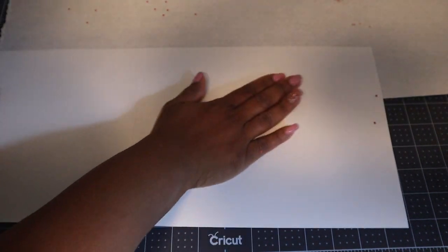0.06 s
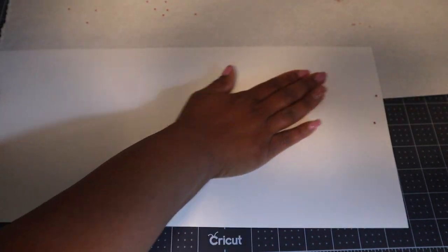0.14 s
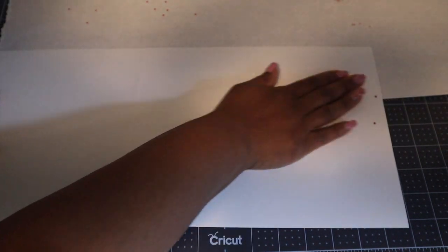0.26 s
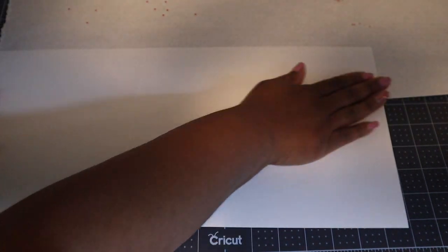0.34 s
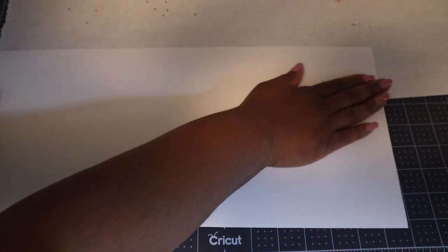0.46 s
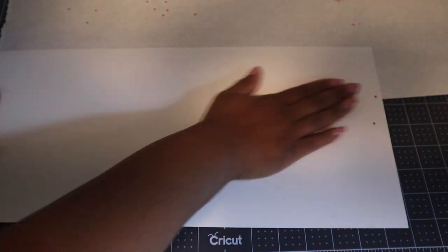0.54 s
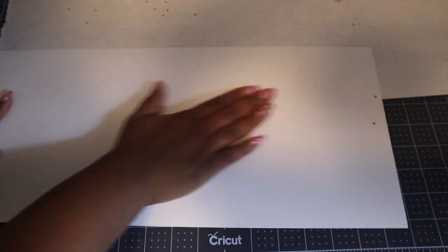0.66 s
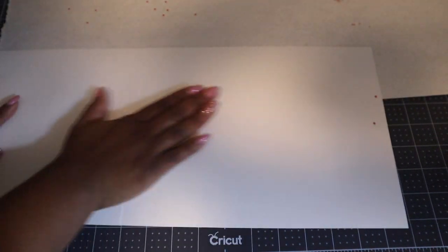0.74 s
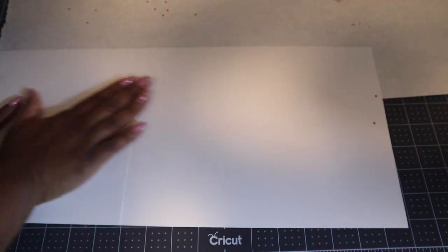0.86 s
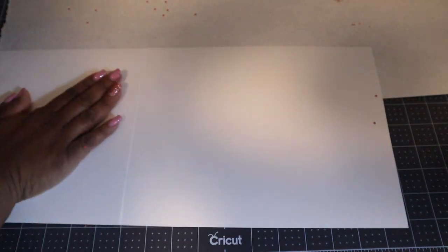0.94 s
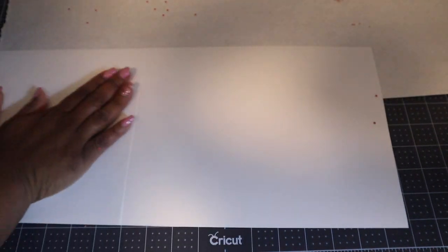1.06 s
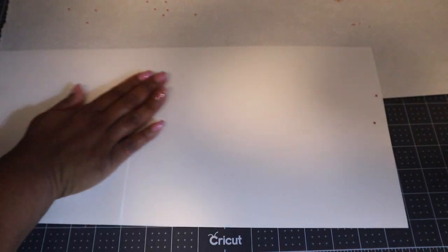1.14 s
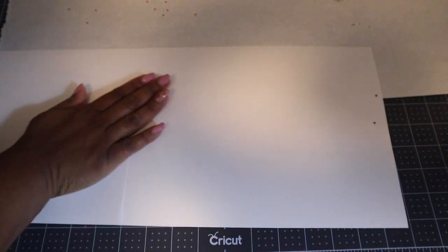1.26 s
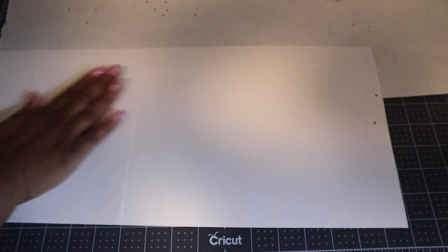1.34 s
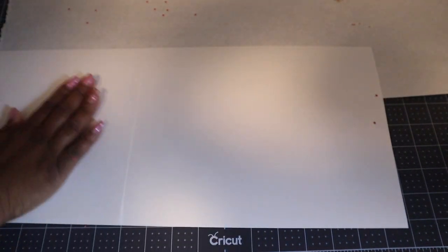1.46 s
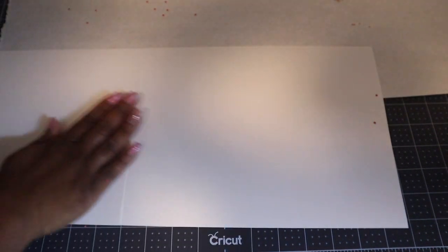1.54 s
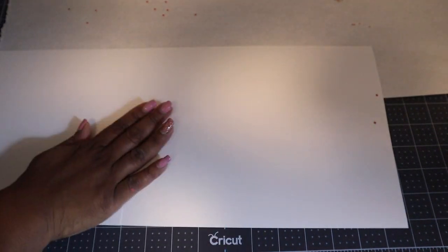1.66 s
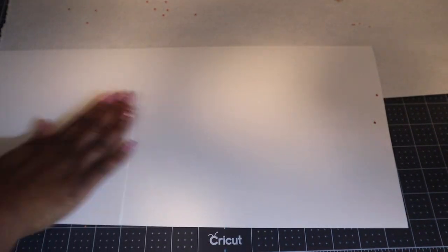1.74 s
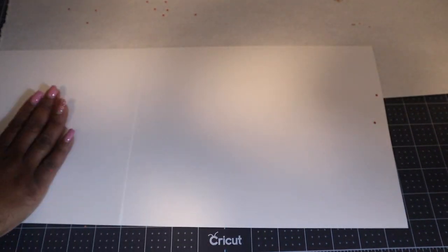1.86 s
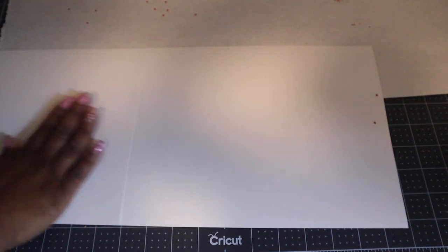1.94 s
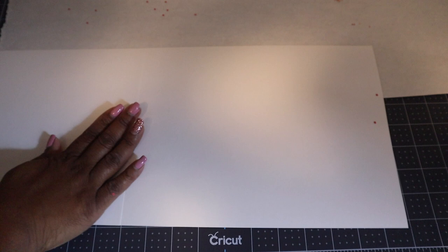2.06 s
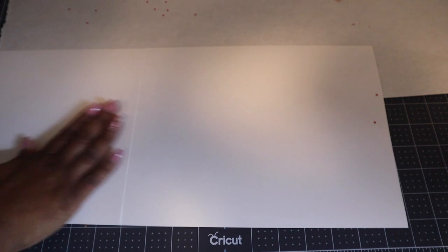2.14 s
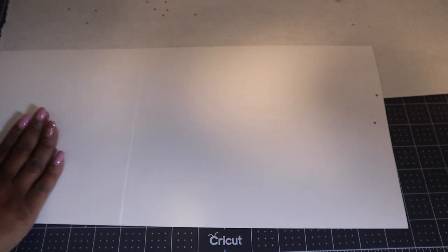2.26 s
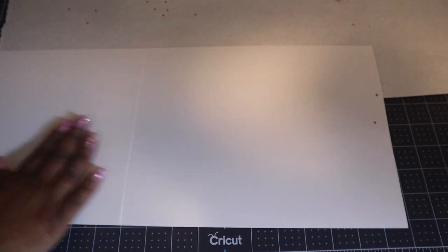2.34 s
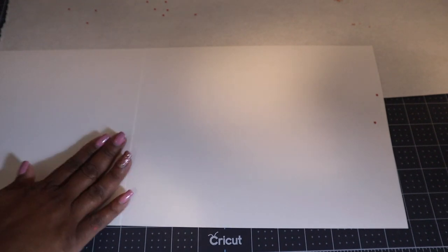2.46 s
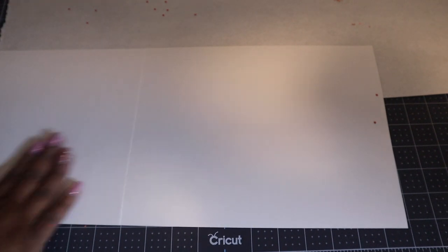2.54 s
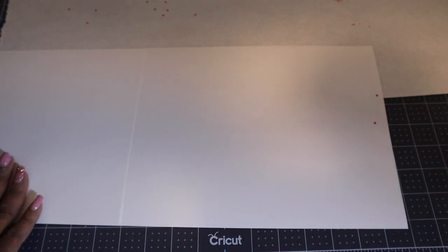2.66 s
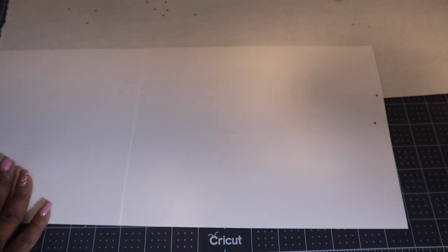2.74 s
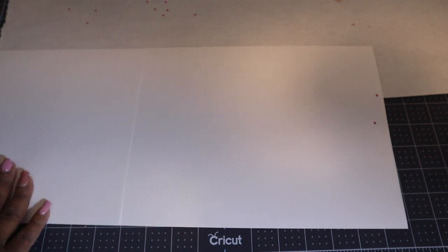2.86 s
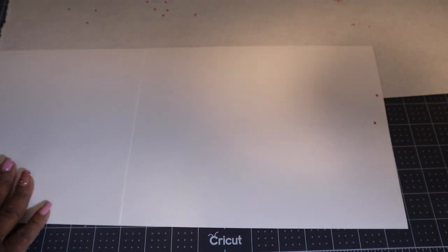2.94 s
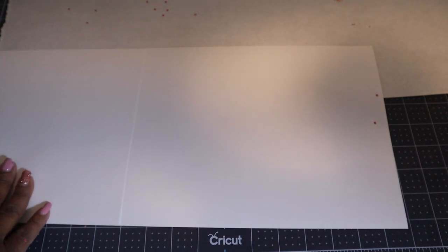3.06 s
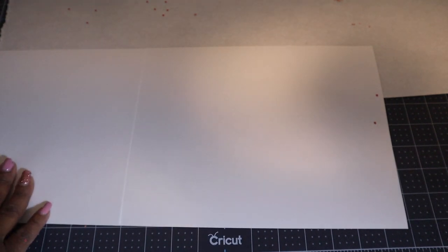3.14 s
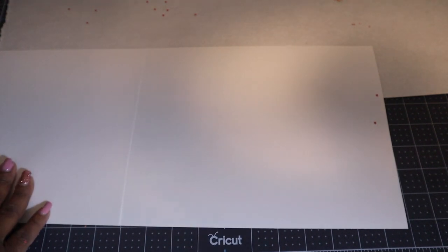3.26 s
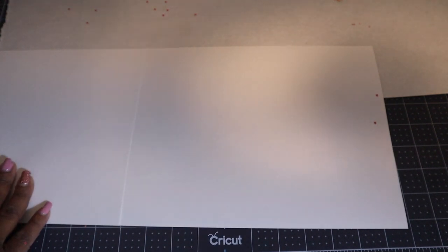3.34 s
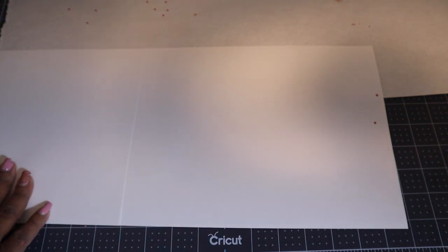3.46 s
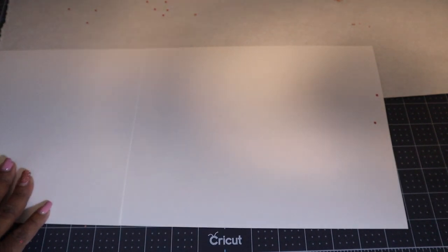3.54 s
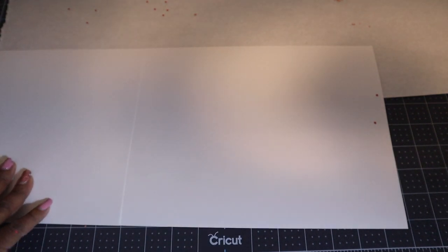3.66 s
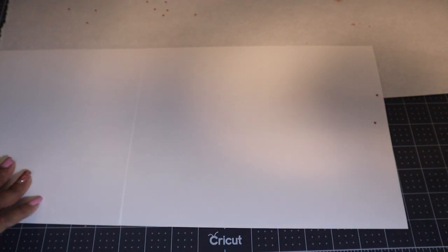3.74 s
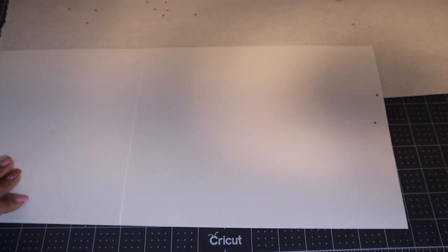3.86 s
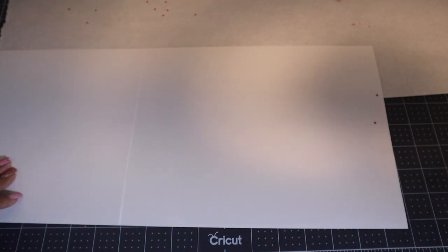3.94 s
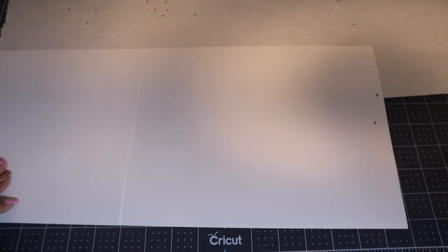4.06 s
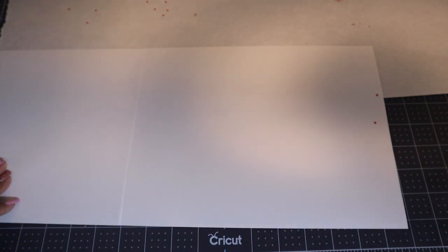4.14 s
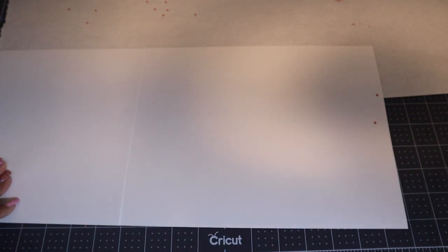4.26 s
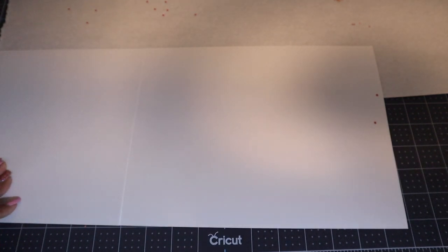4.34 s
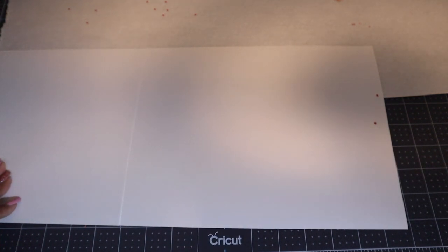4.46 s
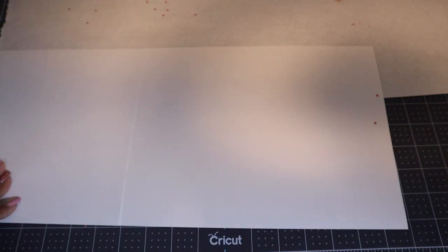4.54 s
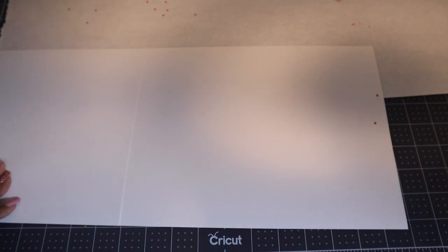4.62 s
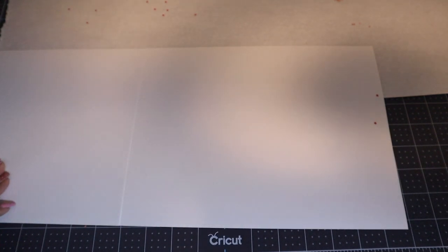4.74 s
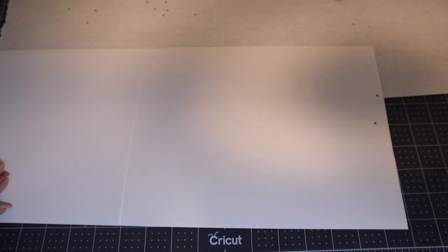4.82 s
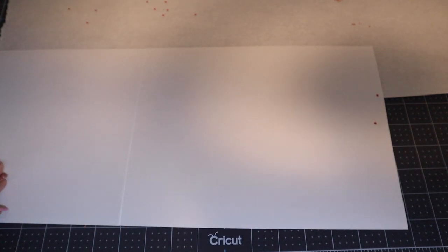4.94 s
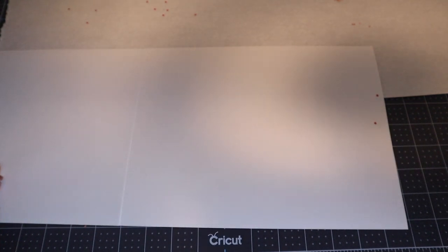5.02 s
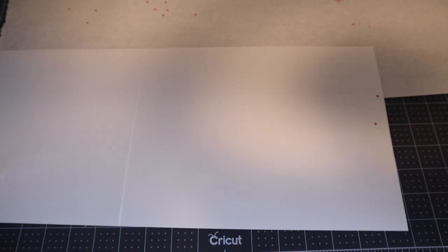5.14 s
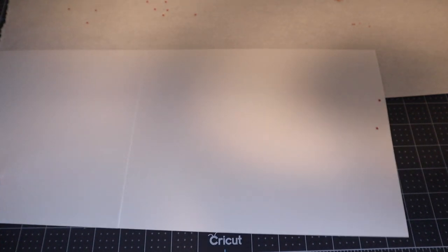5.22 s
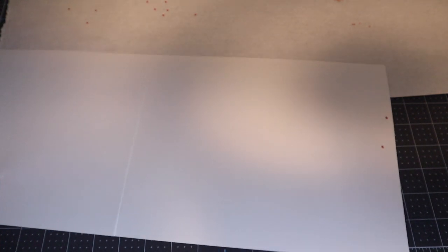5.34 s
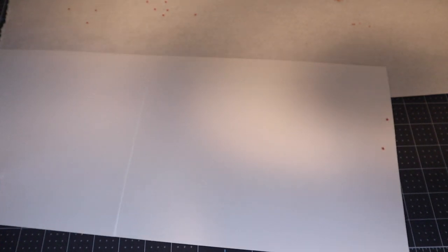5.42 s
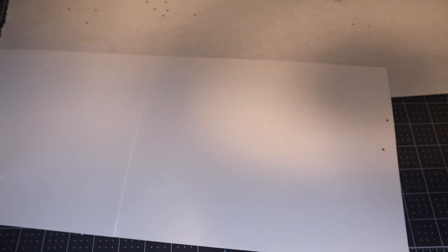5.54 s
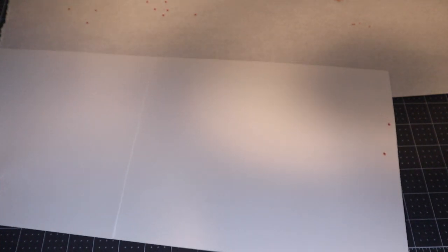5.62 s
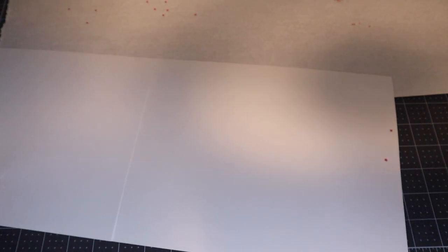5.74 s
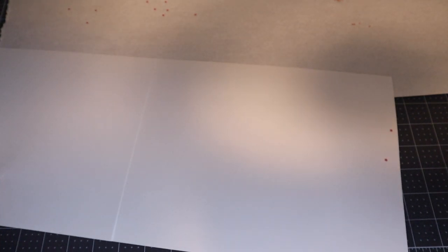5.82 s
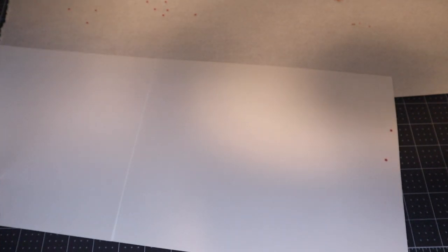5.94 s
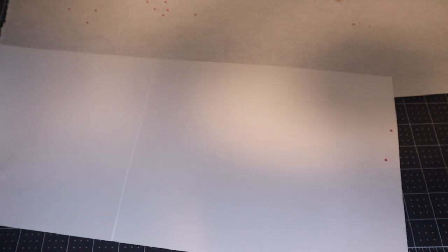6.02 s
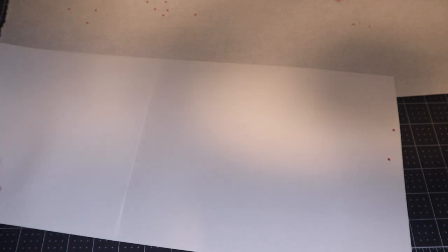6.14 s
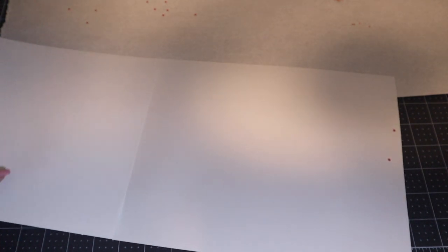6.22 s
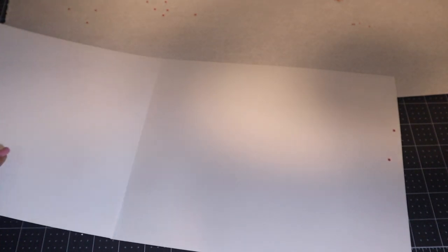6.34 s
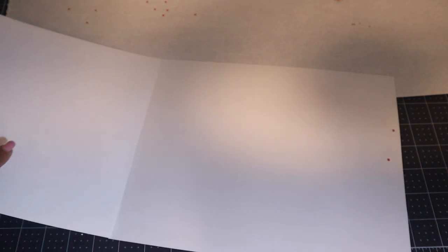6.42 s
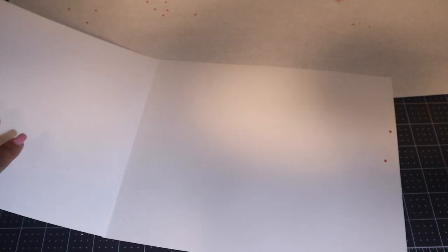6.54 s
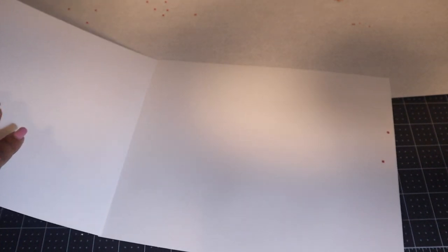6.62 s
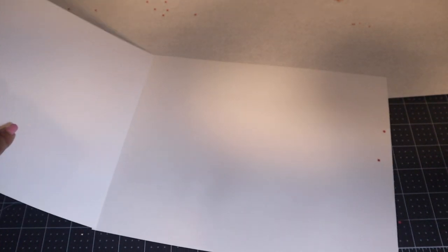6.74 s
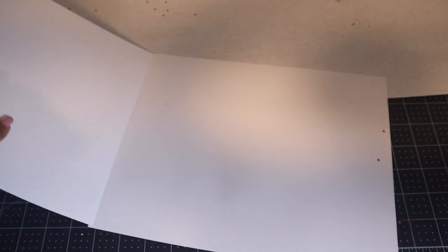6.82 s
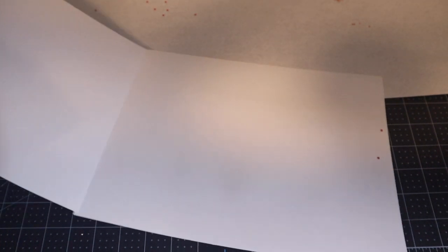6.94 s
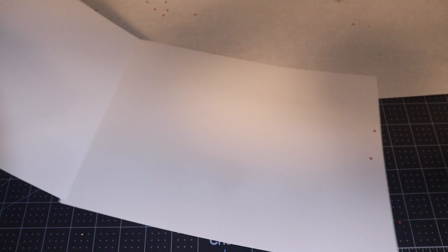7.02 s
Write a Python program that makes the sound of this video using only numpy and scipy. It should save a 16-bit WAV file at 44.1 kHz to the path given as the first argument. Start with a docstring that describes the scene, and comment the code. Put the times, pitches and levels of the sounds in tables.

```python
"""Quick dry palm strokes smooth a plastic sheet on a craft table, with nails ticking over a crease.
Then the sheet is nudged and lifted: it slides, crinkles and buckles with small pops, amid knocks on the table.
Friction is shaped noise driven by hand speed and pressure; ticks, pops and knocks are short ringing blows.
The table rumbles under the arm and faint air noise wavers behind it.
Two close microphone ports hear it in a small room, through a comb filter for mains hum."""
import sys
import numpy as np
from scipy import signal
from scipy.fft import rfft, irfft, next_fast_len
from scipy.io import wavfile
from scipy.ndimage import uniform_filter1d, map_coordinates

SR = 44100
rng = np.random.default_rng(int(sys.argv[2]) if len(sys.argv) > 2 else 0)


def transcribe(u):
    """Save the signal u as a 16-bit wav file named by the first command-line argument.

    u: samples, shape (n,) or (channels, n), limited to [-1, 1]; the rate is SR.
    q: integer samples, one column per channel.
    """
    v = np.clip(np.atleast_2d(u).T, -1, 1)
    q = np.round(v * 32767).astype(np.int16)
    wavfile.write(sys.argv[1], SR, q)


N = 312228


def amp(db):
    """Decibels to gain."""
    return 10 ** (np.asarray(db) / 20)


def unit(x):
    """Scale to rms 1."""
    return x / np.sqrt(np.mean(x ** 2) + 1e-20)


def along(points, hz):
    """(frequency, value) points read on a log frequency axis."""
    f, v = np.transpose(points)
    return np.interp(np.log(hz + 1), np.log(f + 1), v)


def curves(rows):
    """One value per sample for each column after the time."""
    s, *cols = np.transpose(rows)
    return [np.interp(np.arange(N) / SR, s, c) for c in cols]


def wobble(rate):
    """A smooth random curve with `rate` knots a second."""
    knots = rng.standard_normal(int(N * rate / SR) + 4)
    return map_coordinates(knots, [np.arange(N) * rate / SR])


def ease(u):
    """A quarter sine from 0 to 1, flat before and after."""
    return np.sin(np.pi / 2 * np.clip(u, 0, 1))


def filtered(x, response):
    """x times a complex response of frequency."""
    m = next_fast_len(N + SR // 2)
    return irfft(rfft(x, m) * response(np.fft.rfftfreq(m, 1 / SR)), m)[..., :N]


def coloured(x, spectrum):
    """x given a spectrum, at rms 1."""
    return unit(filtered(x, lambda hz: amp(along(spectrum, hz))))


def causal(spectrum, size=2048):
    """Minimum-phase impulse response of peak 1: this spectrum with a sharp front."""
    cepstrum = irfft(np.log(amp(along(spectrum, np.fft.rfftfreq(size, 1 / SR)))))
    # fold the cepstrum forward in time
    cepstrum[1:size // 2] *= 2
    cepstrum[size // 2 + 1:] = 0
    h = irfft(np.exp(rfft(cepstrum)))
    return h / np.abs(h).max()


def swept(x, pitch_hz, shape):
    """x through a resonance that moves with the pitch, at rms 1."""
    hz, t, z = signal.stft(x, SR, nperseg=512)
    pitch_now = np.interp(t * SR, np.arange(N), pitch_hz)
    octaves = np.log2((hz[:, None] + 1) / pitch_now)
    gain = amp(np.interp(octaves, *np.transpose(shape)))
    return unit(signal.istft(z * gain, SR, nperseg=512)[1][:, :N])


def impulses(rate, uneven_db):
    """Tiny blows at random moments: most are weak, a few stand out."""
    draw = rng.random((int(rate * N / SR), 2))
    size = amp(uneven_db * np.minimum(-np.log(1 - draw[:, 1]), 2))
    signs = rng.choice([-1, 1], len(size))
    return np.bincount((draw[:, 0] * N).astype(int), size * signs, N)


def add(track, s, sound):
    """Mix a sound into a track at time s."""
    part = track[max(round(s * SR), 0):][:len(sound)]
    part += sound[:len(part)]


def ports(x, lead):
    """A mono source at two ports: half the phase lead goes to each, in opposite directions."""
    return filtered(x, lambda hz: np.exp(.5j * np.outer([1, -1], along(lead, hz))))


# where the hand rubs: (time [s], place [0 left - 1 right])
HAND_PLACE = [(0, 0.92), (.3, 0.67), (.6, 0.94), (.8, 0.068), (1.1, 0.008)]
# phase by which the left port leads, for a source on either side: (frequency [Hz], lead [radians])
LEAD_FROM_LEFT = [(100, 0), (1000, .35), (2000, 1.2), (3200, 2), (5700, 2.65), (8000, 2.55), (10300, 2.6),
                  (11800, 3.05)]
LEAD_FROM_RIGHT = [(100, -1.8), (2000, -1.4), (4500, 0.34), (6500, -1.5), (12000, -1.4)]


def placed(x, left_db):
    """A source shared between left and right as the hand moves; left_db sets the left source's port imbalance."""
    right = np.clip(curves(HAND_PLACE)[0], 0, 1)
    left_side = ports(x[0] * np.sqrt(1 - right), LEAD_FROM_LEFT) * amp([[left_db / 2], [-left_db / 2]])
    right_side = ports(x[-1] * np.sqrt(right), LEAD_FROM_RIGHT) * amp([[-1.2], [1.2]])
    return left_side + right_side


# how long the room rings: (frequency [Hz], decay by 60 dB [s])
ROOM_DECAY = [(150, 0.36), (2000, 0.22), (6000, 0.16), (12000, 0.13)]


def room(x, wet_db):
    """Direct sound and a short diffuse tail whose decay time varies with frequency."""
    hz, t, z = signal.stft(rng.standard_normal((2, SR // 3)), SR, nperseg=256)
    decay = amp(-60 * t / along(ROOM_DECAY, hz)[:, None])
    tail = signal.istft(z * decay, SR, nperseg=256)[1]
    return x + amp(wet_db) * signal.fftconvolve(x, tail / np.linalg.norm(tail[0]), axes=1)[:, :N]


def friction(spectrum, grain_db, patchy_db, spread):
    """Countless tiny slips of uneven size over a wide patch of contact, in stereo."""
    slips = rng.standard_normal((4, N)) * amp(grain_db * wobble(2500))
    z = signal.stft(slips, nperseg=256)[2]

    def field(size, count):
        """Random levels smoothed over `size` frequency bins and `count` frames."""
        noise = uniform_filter1d(rng.standard_normal(z.shape[1:]), size, axis=0)
        return unit(uniform_filter1d(noise, count, axis=1))

    # changing contact changes which parts of the sheet sound: broad flickers, and narrow bands that last
    patches = unit(field(size=6, count=9) + field(size=3, count=40))
    slips = signal.istft(z * amp(patchy_db * patches), nperseg=256)[1][:, :N]
    return coloured(placed(slips[:2], left_db=4.5) + spread * slips[2:], spectrum)


# spectrum of the room noise: (frequency [Hz], relative level [dB])
AIR_SPECTRUM = [(20, -30), (100, -10), (250, -4.5), (380, -18), (470, -11.5), (700, -19), (1150, -48),
                (1600, -38), (2150, -21.5), (2900, -36), (4100, -33), (7000, -44.5), (15000, -61)]


def air():
    """Faint room noise that wavers slightly, partly shared by the two ports."""
    noise = rng.standard_normal(N) + .5 * rng.standard_normal((2, N))
    return amp(-70.5 + 1.5 * wobble(7.1)) * coloured(noise, AIR_SPECTRUM)


# heaviest bumps of hand and arm on the table: (time [s], relative level [dB])
ARM_BUMPS = [(.15, -33), (.564, -38), (.836, -38.5), (.98, -38.5), (1.435, -33.5), (1.54, -38.5),
             (1.828, -38.5), (2.274, -33.5), (2.638, -37.5), (2.78, -43), (3.112, -41), (4.482, -41),
             (5.782, -42)]


def bumps(swell_s):
    """Each soft push of the hand makes the table top swing unevenly a few times."""
    track, t = np.zeros(N), np.arange(SR // 8) / SR
    swell = np.exp(-((t - t.mean()) / swell_s) ** 2)
    swings = coloured(rng.standard_normal(N), TABLE_SPECTRUM)
    for k, (s, db) in enumerate(ARM_BUMPS):
        bump = swell * swings[k * len(t):][:len(t)]
        add(track, s - t.mean(), amp(db - 4.0) * bump / np.abs(bump).max())
    return track


# spectrum of the table top's boom: (frequency [Hz], relative level [dB])
TABLE_SPECTRUM = [(20, -43), (45, -31.5), (62, -13), (78, -5), (98, -14), (120, 2.5), (145, 2), (180, -6),
                  (250, -16.5), (400, -27.5), (700, -35), (1000, -46.5), (2000, -75)]
REST_DB, RUB_DB = -63, -61  # trembling under the resting arm, and what rubbing adds
ARM_INERTIA_S = 0.73  # the trembling follows the hand's speed averaged over this time


def table():
    """The table top booms in lumps under the moving arm."""
    boom = unit(coloured(rng.standard_normal(N), TABLE_SPECTRUM) * amp(3.8 * wobble(25)))
    apart = 0.14 * coloured(rng.standard_normal((2, N)), TABLE_SPECTRUM)
    effort = uniform_filter1d(rubbing()[0], size=int(ARM_INERTIA_S * SR))
    shake = amp(REST_DB) + amp(RUB_DB) * effort
    return shake * (boom + apart) + bumps(swell_s=0.025)


# knocks: (time [s], relative level [dB], hardness [dB per octave], relative scuff level [dB])
TABLE_KNOCKS = [(3.761, -54, 29, 13.5), (4.207, -41.5, -1, 16.5), (4.215, -34.5, -3, -8),
                (4.223, -31.5, -8, -2), (6.737, -45.5, 5, -4.5), (6.863, -27, 14.5, 0),
                (6.878, -36.5, -4, 3), (6.900, -35, 6, -1.5)]
# what the table rings with: (frequency [Hz], relative level [dB], decay by 60 dB [s])
RINGING_MODES = [(243, -11, 0.1), (340.5, -2.5, 0.084), (446, -2.5, 0.11), (548, -3, 0.048),
                 (715, -3.5, 0.09), (778, -10.5, 0.062)]
# spectra of the knock's rattle and of the plastic scuff: (frequency [Hz], relative level [dB])
RATTLE_SPECTRUM = [(40, -28), (100, -8), (200, -8.5), (400, -2), (750, -1), (950, -11), (1200, -25),
                   (2000, -13.5), (5000, -44.5)]
SCUFF_SPECTRUM = [(500, -36), (1200, -20), (1620, -3), (2050, 13), (2420, 3.5), (2850, -21.5), (3500, 5.5),
                  (5000, 1), (7000, -7), (11000, -23), (13000, -60)]


def knocks():
    """Knocks on the table to the left, each with a scuff of plastic; harder ones favour the higher modes."""
    track, t = np.zeros(N), np.arange(SR // 8) / SR
    hz, mode_db, t60 = np.transpose(RINGING_MODES)[:, :, None]

    def burst(spectrum):
        return unit(signal.fftconvolve(rng.standard_normal(len(t)), causal(spectrum))[:len(t)])

    for s, db, hardness_db, scuff_db in TABLE_KNOCKS:
        rattle = burst(RATTLE_SPECTRUM) * amp(-60 * t / 0.13)
        scuff = burst(SCUFF_SPECTRUM) * amp(-60 * t / 0.068)
        weights = amp(mode_db + hardness_db * np.log2(hz))
        modes = weights * amp(-60 * t / t60) * np.sin(2 * np.pi * (hz * t + rng.random(hz.shape)))
        onset = 1 - np.exp(-t / 0.00047)
        ring = modes.sum(axis=0) / np.linalg.norm(weights) * onset
        thud = 1.31 * ring + 0.52 * rattle
        add(track, s, amp(db - 8.5) * (thud + amp(scuff_db) * scuff))
    return room(ports(track, LEAD_FROM_LEFT) * amp([[3.5], [-5]]), wet_db=-13.0)


# spectrum of one snap: (frequency [Hz], relative level [dB])
SNAP_SPECTRUM = [(600, -7), (1200, -44.5), (2000, -3), (4000, 8), (7000, 2.5), (11000, 2), (15000, -25.5)]
SNAPS_PER_S, SNAP_UNEVEN_DB = 70, 4  # average rate, scatter of the sizes


def snaps():
    """Small sharp snaps where crease or grit gives way."""
    blows = impulses(SNAPS_PER_S, SNAP_UNEVEN_DB)
    return placed([signal.fftconvolve(blows, causal(SNAP_SPECTRUM))[:N]], left_db=0.5)


# shoves of the sheet over the mat:
# (start [s], rise [s], hold [s], relative hiss level [dB], relative crinkle level [dB])
SHOVES = [(0.002, 0.006, 0.035, -54, -52), (2.8, 0.0027, 0.039, -61.5, -70),
          (2.894, 0.035, 0.013, -69.5, -62), (3.047, 0.011, 0.016, -70, -81),
          (3.696, 0.014, 0.11, -65.5, -78), (3.813, 0.055, 0.063, -60, -81),
          (3.949, 0.03, 0.12, -71.5, -65), (4.299, 0.0209, 0.0063, -66.5, -59.5),
          (4.576, 0.015, 0.011, -54.5, -86), (4.858, 0.017, 0.0046, -68.5, -62.5),
          (5.129, 0.0028, 0.004, -55, -69), (5.213, 0.072, 0.051, -65.5, -64.5),
          (5.322, 0.021, 0.029, -43.5, -36.5), (5.396, 0.0068, 0.016, -51.5, -43.5),
          (5.567, 0.013, 0.008, -55, -45.5), (5.641, .008, 0.042, -59, -50),
          (5.709, 0.0082, 0.0066, -58, -40), (5.741, 0.0078, 0.02, -93, -58),
          (5.809, 0.019, 0.0064, -44, -32.5), (5.866, 0.01, 0.023, -66, -49),
          (5.925, 0.0092, 0.056, -78, -52), (6.017, 0.0067, 0.02, -49.5, -49.5),
          (6.045, .02, 0.033, -67, -54.5), (6.12, 0.023, 0.068, -46.5, -42.5),
          (6.214, 0.011, .06, -48, -46.5), (6.287, 0.01, 0.052, -45, -39.5),
          (6.366, 0.004, 0.038, -41.5, -37.5), (6.406, 0.012, 0.018, -41.5, -46),
          (6.495, 0.023, 0.16, -69.5, -65.5), (6.713, 0.026, 0.11, -61, -56.5),
          (6.848, 0.005, 0.0077, -45, -44.5), (7.03, 0.043, 0.0091, -57.5, -59)]
# faint rustle while the sheet is handled: (start [s], relative hiss level [dB], relative crinkle level [dB])
HANDLING_CREEP = (3.5, -88, -78)
SETTLE_DB_PER_S = 357  # how fast the sheet comes to rest after a shove


def shoving():
    """Hiss and crinkle gains: each shove rises, holds and settles, over a faint creep."""
    t = np.arange(N) / SR
    begin, *creep_db = HANDLING_CREEP
    power = np.outer(amp(creep_db), t > begin) ** 2
    for s, rise, hold, *levels_db in SHOVES:
        settling = amp(-SETTLE_DB_PER_S * np.maximum(t - s - rise - hold, 0))
        shape = ease((t - s) / rise) ** 2 * settling
        power += np.outer(amp(levels_db), shape) ** 2
    return np.sqrt(power)


# spectrum of the scraping sheet: (frequency [Hz], relative level [dB])
SCRAPE_SPECTRUM = [(700, -11.5), (1300, -28), (2200, -0.5), (3500, -10), (5000, 4), (7000, 1), (10500, 7),
                   (11700, 5.5), (12700, -22), (14000, -55)]
# the crinkle's pitch follows the bend of the sheet: (time [s], pitch [Hz])
BEND_PITCH = [(5.25, 4150), (5.32, 2266), (5.39, 2280), (5.41, 3200), (5.56, 3180), (5.6, 2490),
              (5.68, 2250), (5.72, 3330), (5.81, 3000), (5.84, 2410), (6.02, 2180), (6.15, 2380),
              (6.205, 2250), (6.225, 1850), (6.275, 1940), (6.3, 2300), (6.86, 2105)]
# resonance of the freely bending sheet: (distance from the pitch [octaves], relative level [dB])
BENT_RESONANCE = [(-1, -38.5), (-.4, -20.5), (-.13, 2.5), (0, 4.5), (0.18, -6), (.85, 1), (1.3, -10.5),
                  (1.5, -31)]
FLEXES_PER_S, SNAP_DB = 550, -1  # average crinkle rate, snap gain beside the scrape


def sliding():
    """The shifted sheet scrapes unevenly over the mat, and crinkles in clumps and snaps as it bends."""
    hiss_gain, crinkle_gain = shoving()
    scrape = friction(SCRAPE_SPECTRUM, grain_db=2.5, patchy_db=3.4, spread=0.69)
    scrape = amp(0.5 + 2.4 * wobble(110)) * scrape
    clumps = impulses(FLEXES_PER_S, uneven_db=5) * amp(3.5 * wobble(90))
    pitch_hz = curves(BEND_PITCH)[0] * 2 ** (.11 * wobble(110))
    flexes = swept(placed([clumps], left_db=6.5), pitch_hz, BENT_RESONANCE)
    hissing = hiss_gain * (scrape + amp(SNAP_DB) * snaps())
    return room(hissing + crinkle_gain * amp(-4) * flexes, wet_db=-11.0)


# the sheet buckling: (time [s], relative level [dB], pitch [Hz])
BUCKLES = [(.007, -26, 4250), (0.0298, -23, 3390), (0.432, -32.5, 3710), (.9942, -31, 3300),
           (2.0237, -10, 2470), (2.041, -27, 2800), (2.064, -18, 2430), (2.4152, -14, 2040),
           (2.812, -43, 4440), (4.2054, -29, 2240), (4.210, -25, 2200), (5.134, -42, 4140),
           (5.332, -27, 2340), (5.415, -28, 3180), (5.584, -36, 2780), (5.596, -45, 2600),
           (5.637, -36, 2330), (5.648, -32, 2390), (5.723, -21, 3840), (5.726, -19, 3170),
           (5.742, -30, 3340), (5.758, -31, 3250), (5.777, -36, 3300), (5.8157, -27, 3120),
           (5.832, -25.5, 2580), (5.848, -36.5, 2360), (6.0236, -38, 2300), (6.146, -23.5, 3940),
           (6.171, -37.5, 2140), (6.192, -27, 4180), (6.2097, -34.5, 2600), (6.226, -35, 1710),
           (6.234, -26.5, 2040), (6.250, -30, 2080), (6.2703, -30, 1970), (6.29, -23.5, 2630),
           (6.303, -27, 2890), (6.428, -29.5, 2380), (6.6056, -21, 2210), (6.6215, -35, 2120),
           (6.636, -37, 2100)]
POP_WIDTH_HZ, POP_SHARPEN_DB = 880, 18  # bandwidth at table level 0 dB, level step that doubles it


def pops():
    """A bulge flips over with a faint higher crack, rings a few cycles and flutters; harder pops are shorter."""
    track, t = np.zeros(N), np.arange(SR // 25) / SR
    u = np.arange(-SR // 300, SR // 300) / SR

    def burst(hz, width_hz):
        return np.exp(-.5 * (2 * np.pi * width_hz * u) ** 2) * np.sin(2 * np.pi * hz * u)

    for s, db, hz in BUCKLES:
        width_hz = POP_WIDTH_HZ * 2 ** (db / POP_SHARPEN_DB)
        flip = burst(hz, width_hz) + 0.2 * burst(1.5 * hz, 4 * width_hz)
        ripples = 0.056 * rng.standard_normal(len(t)) * amp(-60 * t / 0.029)
        ripples[0] = 1
        add(track, s + u[0], amp(db - 4.5) * signal.fftconvolve(flip, ripples))
    # the thin sheet radiates little of its slow bending
    track = filtered(track, lambda hz: 1 / (1 + (1400 / (hz + 1)) ** 16))
    return room(placed([track], left_db=4.5), wet_db=-8.5)


# sharp ticks of nails and crease:
# (time [s], relative level [dB], relative body level [dB], relative treble level [dB])
NAIL_TICKS = [(0.1124, -14.5, -2, -12), (0.130, -19.5, -6, -14), (0.2006, -28, 2, -19),
              (0.2596, -20.5, -12, -17), (0.2831, -18, -1.5, -11), (1.3262, -22, -19, -8),
              (1.989, -17.5, 0, -10), (2.053, -20.5, -4, -26), (2.185, -17.5, -10, -9),
              (2.3006, -22.5, -7.5, -25), (2.376, -18.5, -3.5, -19), (2.4118, -13, -5, -24),
              (2.416, -14, -3.5, -21), (2.449, -16, 0.5, -28), (2.809, -41, -17.5, -8),
              (3.563, -50, -28, 6.5), (3.7593, -27, -13.5, -17.5), (3.882, -30.5, -38, 7),
              (4.5651, -42, 7.5, 10), (5.026, -43, -22.5, 2.5), (5.132, -32, -25.5, 2),
              (5.329, -26, -15, -39), (5.584, -32.5, -37, -14), (5.6464, -33, -12, -18),
              (5.8322, -29, -16, -35), (5.899, -34, -2, -16), (6.0213, -29.5, 4.5, -6.5),
              (6.123, -27, -21, -13), (6.1423, -27, -23, -5), (6.1744, -24.5, -16, -26),
              (6.2861, -20.5, -1.5, -4), (6.309, -25, 3, -2), (6.3395, -24, -8, -10), (6.369, -14, -7, -8),
              (6.384, -27, -10, -4), (6.394, -23.5, -7, -10), (6.426, -29.5, -7, -11),
              (6.6044, -33, -5, -2)]


def ticks():
    """A sharp snap, then a few milliseconds of ripples running through the sheet."""
    track, t = np.zeros(N), np.arange(SR // 25) / SR
    for s, db, body_db, treble_db in NAIL_TICKS:
        body = [(200, body_db - 20.5), (750, body_db - 12), (1150, body_db - 27),
                (1700, body_db), (2400, body_db + 0.5)]
        middle = [(4000, 2.5), (6500, -1.0)]
        treble = [(10500, treble_db + 10.5), (12500, treble_db - 1.5), (15500, treble_db - 42.5)]
        blow = 0.115 * rng.standard_normal(len(t)) * amp(-60 * t / .025)
        blow[0] = 1
        snap = signal.fftconvolve(blow, causal(body + middle + treble))
        add(track, s + 0.0011, amp(db + 1.0) * snap / np.abs(snap).max())
    return room(placed([track], left_db=5.5), wet_db=-6.0)


# the strokes turn hollow: (time [s], echo share [0-1])
HOLLOW_SHARE = [(1.85, 0.087), (2.3, 0.15), (2.55, 0.46)]
HOLLOW_DELAY_S = .00054


def hollowed(x):
    """x mixed with a very short, dulled echo, which cuts evenly spaced notches."""
    share = np.clip(curves(HOLLOW_SHARE)[0], 0, 1)
    echo = filtered(x, lambda hz: np.exp(-2j * np.pi * hz * HOLLOW_DELAY_S) / (1 + (hz / 8000) ** 4))
    return (x + share * echo) / np.sqrt(1 + share ** 2)


# palm strokes, back and forth: (start [s], length [s], speeding up [s], slowing down [s],
# relative hiss level [dB], relative rasp level [dB], hardest press [share of length], relative grit level [dB])
PALM_STROKES = [(0.01, 0.5, 0.13, 0.21, -40.5, -48, 0.48, -39),
                (0.459, 0.57, 0.16, 0.11, -31, -32.5, 0.51, -37),
                (1.031, 0.25, 0.15, 0.12, -34.5, -41, 0.79, -50.5),
                (1.278, .24, 0.088, 0.12, -31, -53.5, 0.44, -41.5),
                (1.425, .3, 0.15, 0.1, -34.5, -38.5, 0.83, -36.5),
                (1.715, 0.23, 0.083, 0.12, -29.5, -39, 0.18, -30.5),
                (1.917, 0.22, .09, 0.1, -41, -40, 0.53, -33.5),
                (2.137, 0.21, 0.081, 0.11, -35, -43, 0.75, -36),
                (2.322, 0.18, 0.071, 0.079, -42.5, -36, 0.72, -35.5),
                (2.506, 0.24, 0.087, 0.18, -38, -48, 0.51, -48)]
SPEED_POWER = 3.98  # friction amplitude grows as this power of the hand's speed
PRESS_FALL_DB = 65  # rasp loss one stroke length from the hardest press; grows with distance squared
PRESSED_HZ, EASE_OCTAVES = 1880, 3.2  # rasp pitch from the hardest press on, rise one stroke length earlier


def rubbing():
    """Hand speed, hiss, rasp and grit gains, rasp pitch: strokes speed up, glide and slow, pressing hardest once."""
    t = np.arange(N) / SR
    motion, hiss, rasp, grit, lightness = np.zeros((5, N))
    for s, length, rise, fall, hiss_db, rasp_db, hardest, grit_db in PALM_STROKES:
        speed = ease((t - s) / rise) * ease((s + length - t) / fall)
        drag = speed ** SPEED_POWER
        to_press = hardest - (t - s) / length
        motion += speed
        hiss += drag * amp(hiss_db)
        rasp += drag * amp(rasp_db - PRESS_FALL_DB * to_press ** 2)
        grit += drag * amp(grit_db)
        lightness += speed * np.maximum(to_press, 0)
    rasp_hz = PRESSED_HZ * 2 ** (EASE_OCTAVES * lightness / (motion + 1e-9))
    return motion, hiss, rasp, grit, rasp_hz


# spectra of the skin's hiss and of the rasp before its resonance: (frequency [Hz], relative level [dB])
HISS_SPECTRUM = [(700, -29.5), (1150, -47.5), (1700, -20.5), (2500, -8.5), (3700, -1), (4700, 0),
                 (5700, 0.5), (8000, -0.5), (10500, 4), (11600, -0.5), (12800, -7.5), (14200, -42.5)]
RASP_SPECTRUM = [(300, -25), (700, -17.5), (950, -7), (1250, -13.5), (1560, 0), (2200, 4), (3000, -0.5),
                 (4500, -7.5), (8000, -38.5)]
# resonance of the sheet under the palm: (distance from the pitch [octaves], relative level [dB])
PRESSED_RESONANCE = [(-.6, -16), (-.25, -7.5), (0, 1), (.3, -3), (0.799, 2.5), (2, -6.5)]


def palm():
    """Speed makes the skin hiss and catch on grit; pressing harder adds a rasp that sinks in pitch."""
    _, hiss_gain, rasp_gain, grit_gain, rasp_hz = rubbing()
    skin = friction(HISS_SPECTRUM, grain_db=1.5, patchy_db=2.5, spread=0.76)
    hiss = hiss_gain * amp(3.5) * skin
    catches = friction(RASP_SPECTRUM, grain_db=3.0, patchy_db=2.5, spread=0.8)
    catches = amp(2.2 * wobble(110)) * catches
    rasp = rasp_gain * amp(-2.5) * swept(catches, rasp_hz, PRESSED_RESONANCE)
    # the loose right half of the sheet sounds along near 4 kHz
    loose_spectrum = [(1500, -36.0), (2500, -18.5), (3900, 6.5), (4900, -1.5), (7000, -27.5), (14000, -50.0)]
    flutter = friction(loose_spectrum, grain_db=2.5, patchy_db=0.0, spread=0.92)
    loose = hiss_gain * amp(-4.0) * curves(HAND_PLACE)[0] * flutter
    return room(hollowed(hiss + rasp + loose) + grit_gain * snaps(), wet_db=-10.5)


def scene():
    """Room air, table, sheet and hand together."""
    return air() + table() + knocks() + sliding() + pops() + ticks() + palm()


# depth of the hum notches: (frequency [Hz], share [0-1])
COMB_DEPTH = [(100, .45), (700, 0.18), (2000, 0.18), (5000, 0.069), (11000, 0.15)]
HUM_HZ, TOP_HZ = 60, 15400  # mains frequency, band limit


def record(dry):
    """Subtracting a copy one mains period late notches every multiple of the hum, below a sharp band limit."""
    def comb(hz):
        return 1 - np.clip(along(COMB_DEPTH, hz), 0, 1) * np.exp(-2j * np.pi * hz / HUM_HZ)

    return filtered(dry, lambda hz: comb(hz) * (hz < TOP_HZ))


dry = scene()
out = record(dry)
transcribe(out)
```